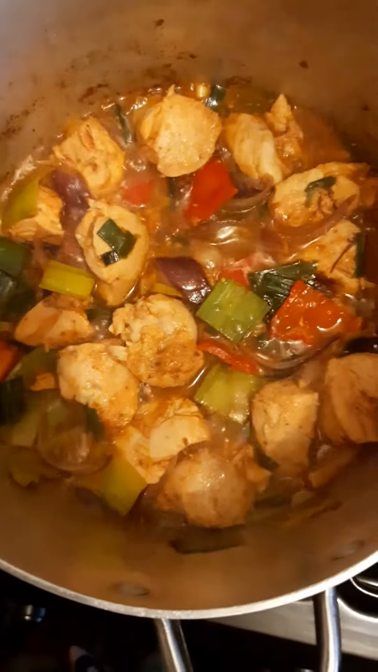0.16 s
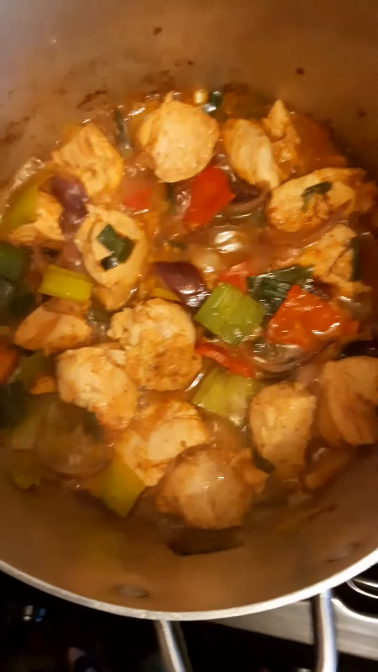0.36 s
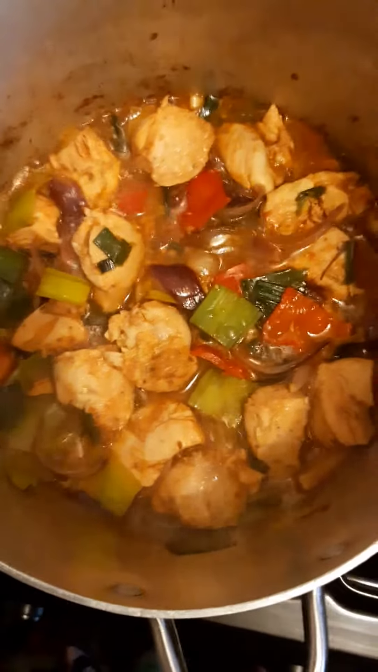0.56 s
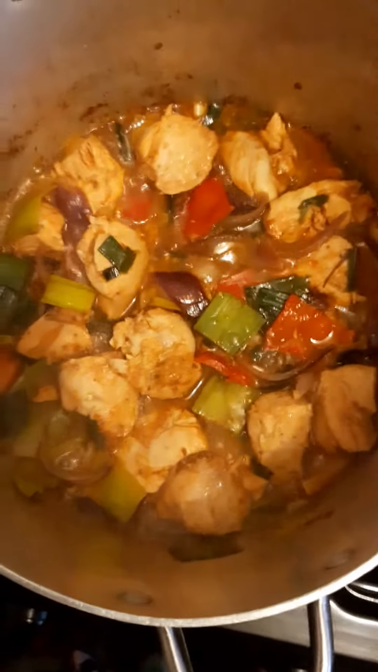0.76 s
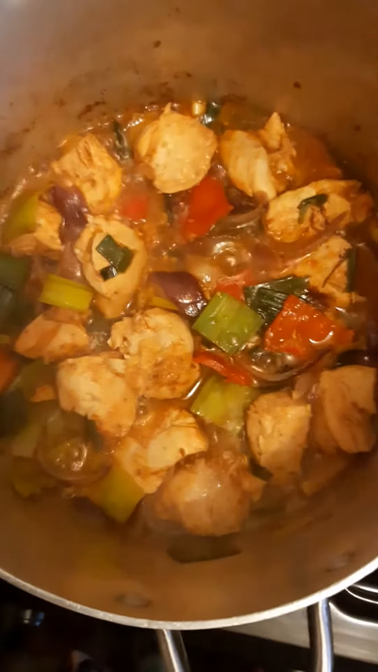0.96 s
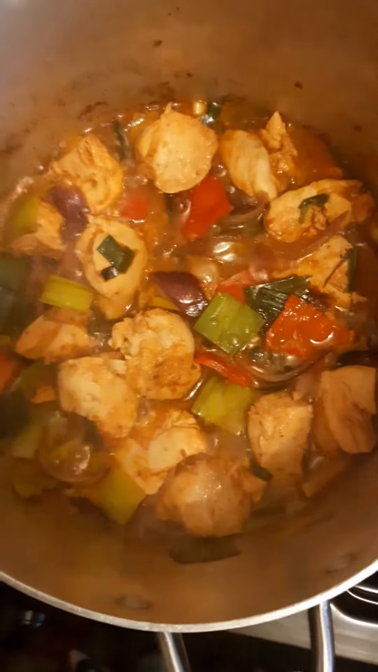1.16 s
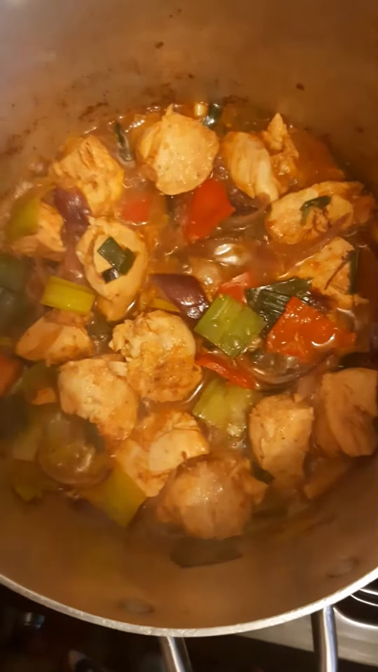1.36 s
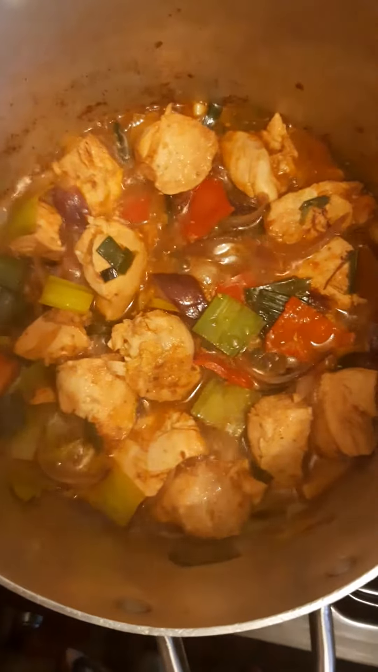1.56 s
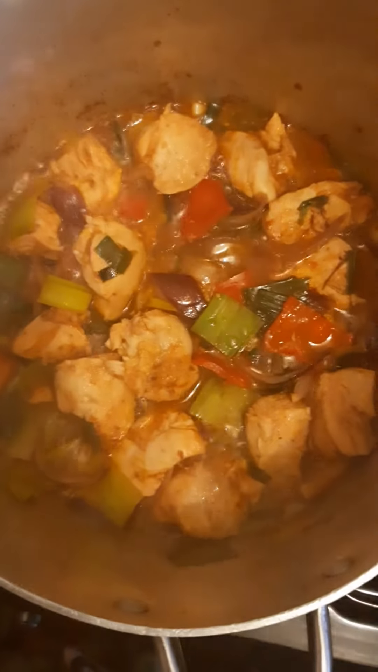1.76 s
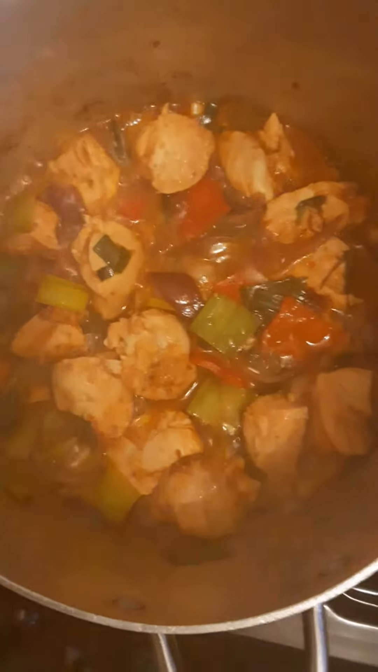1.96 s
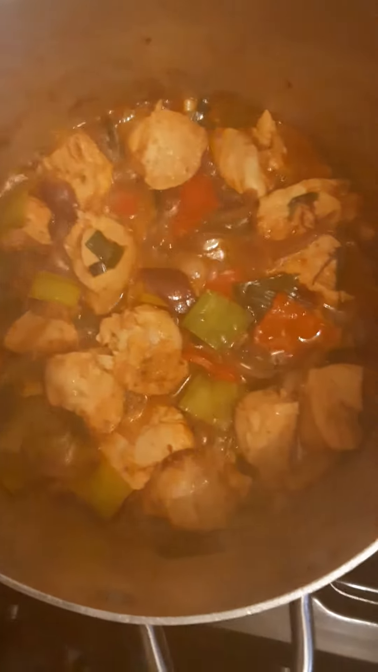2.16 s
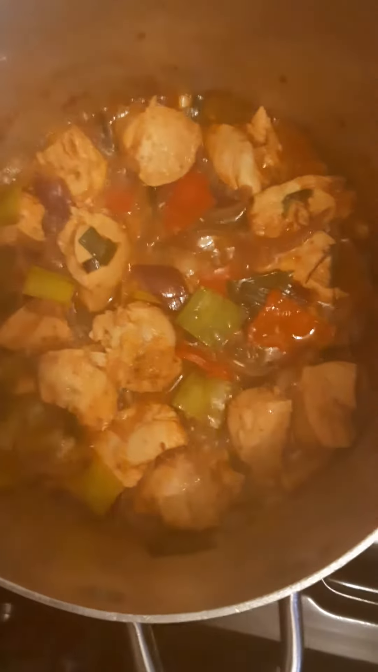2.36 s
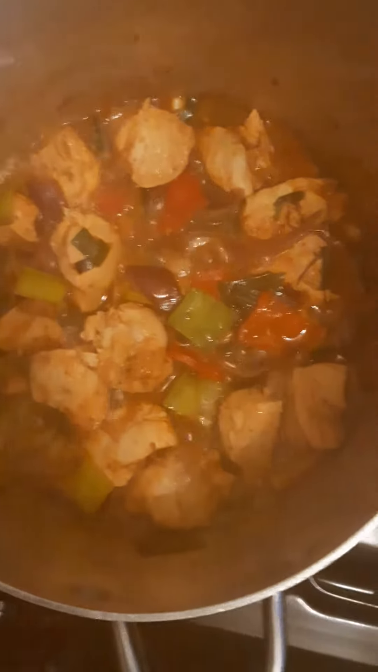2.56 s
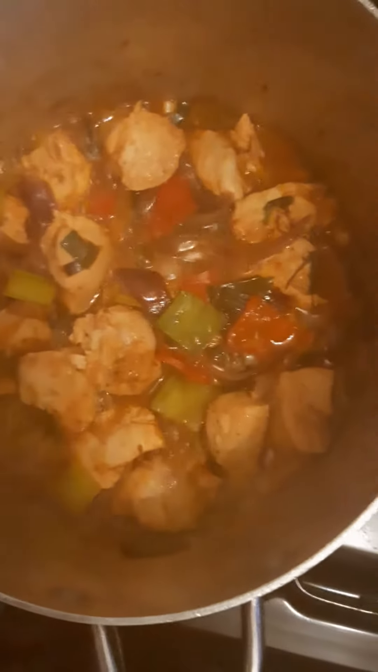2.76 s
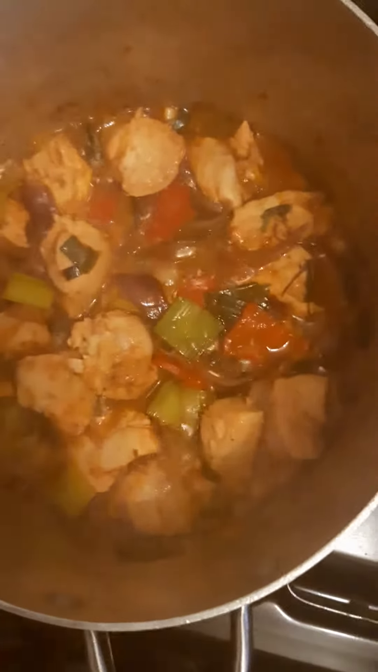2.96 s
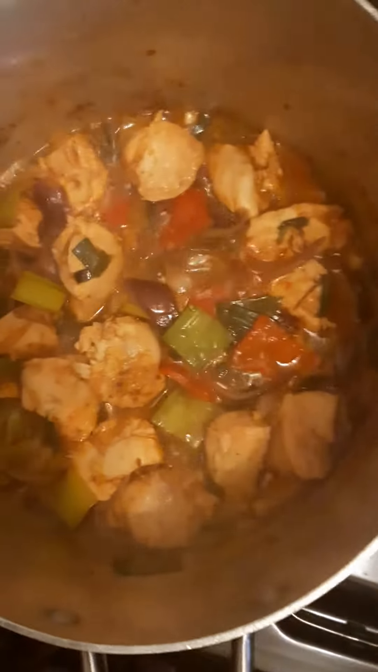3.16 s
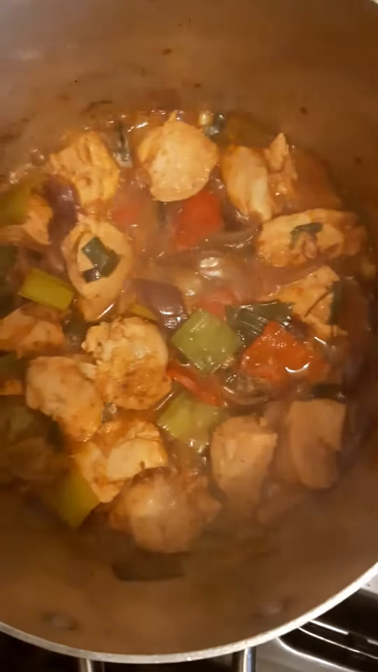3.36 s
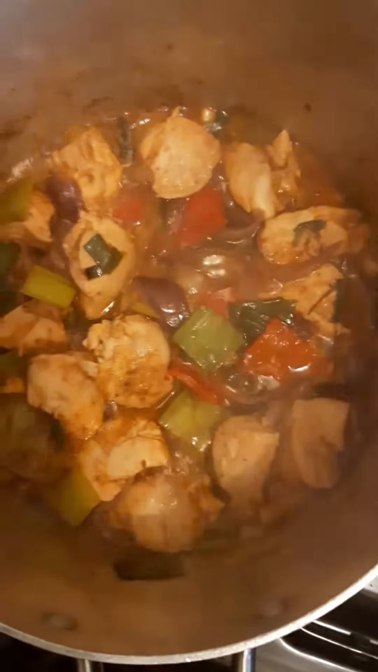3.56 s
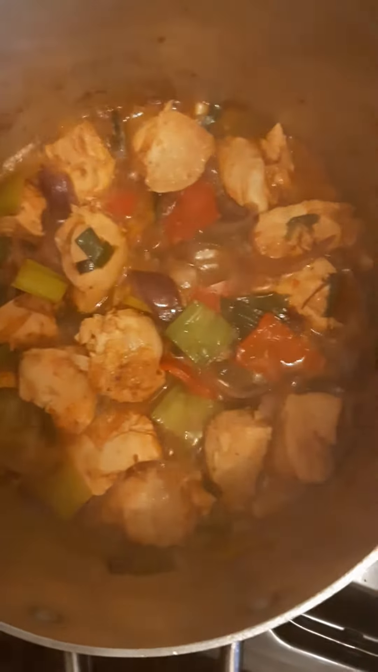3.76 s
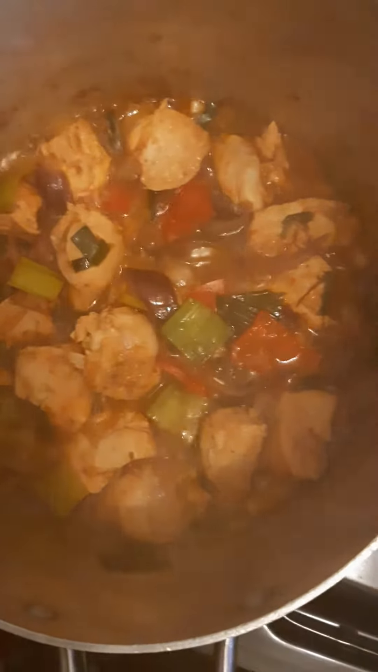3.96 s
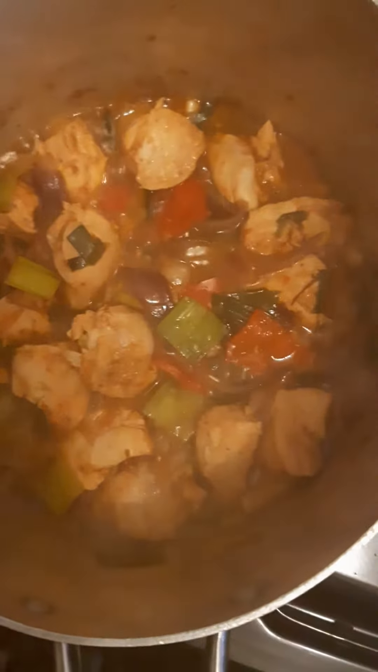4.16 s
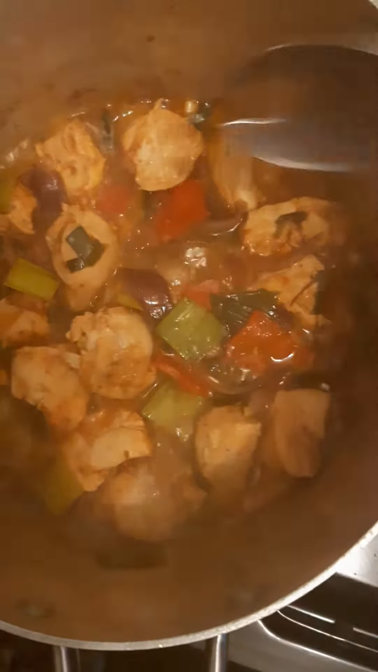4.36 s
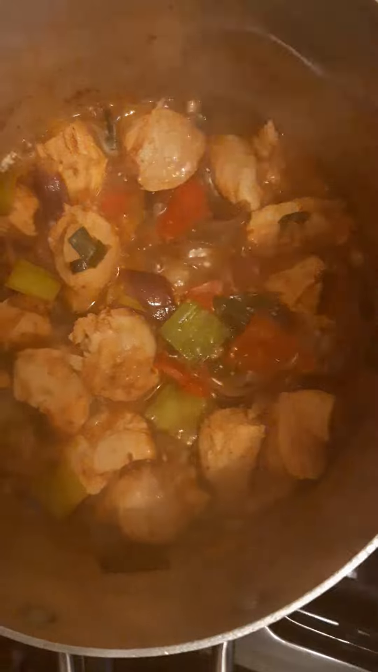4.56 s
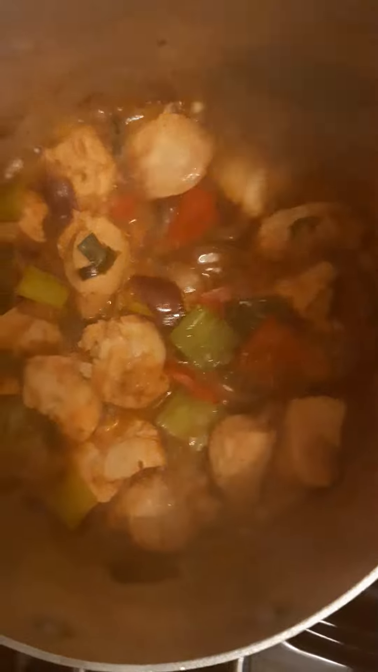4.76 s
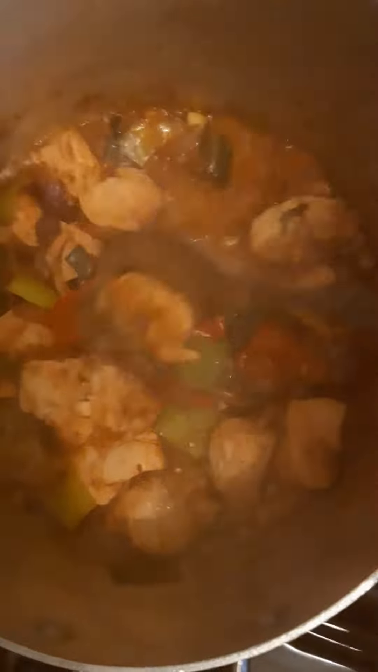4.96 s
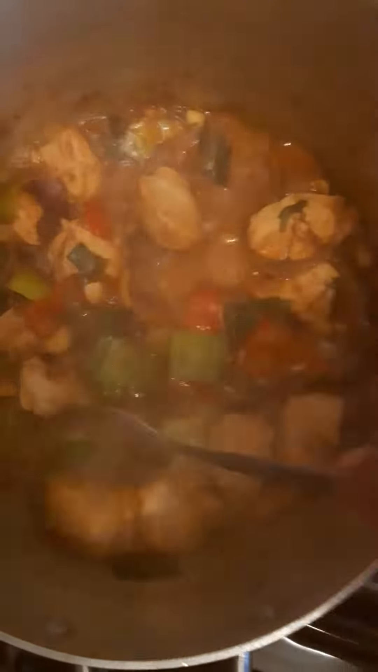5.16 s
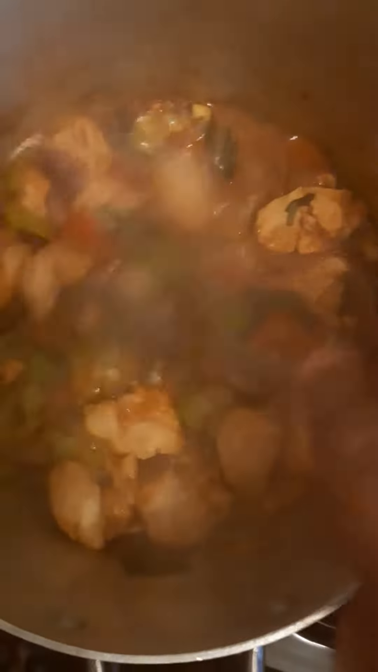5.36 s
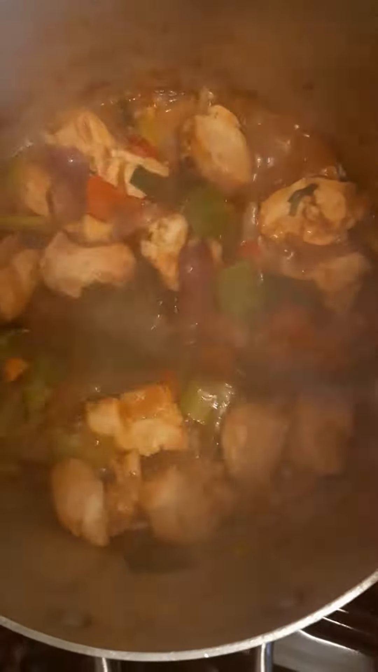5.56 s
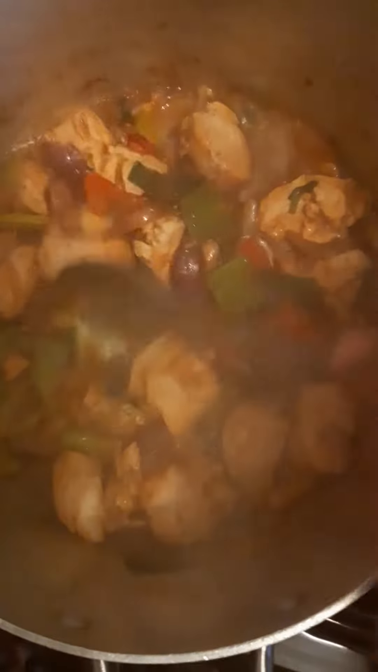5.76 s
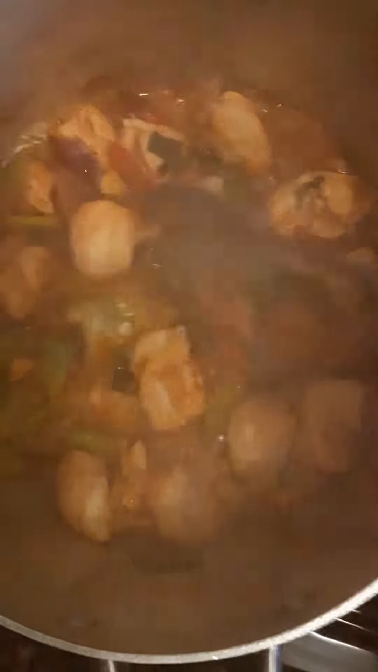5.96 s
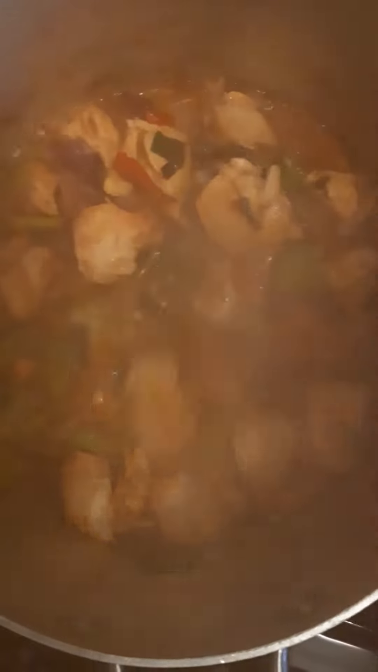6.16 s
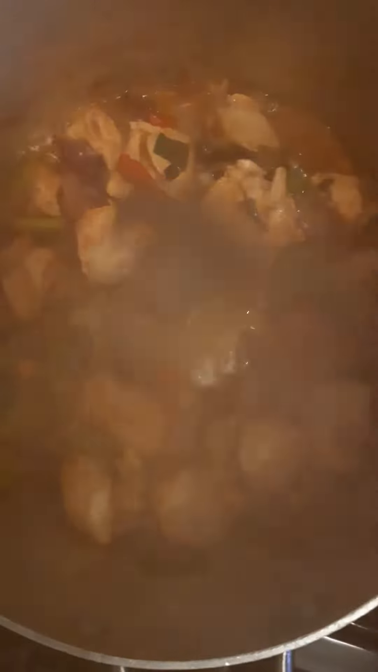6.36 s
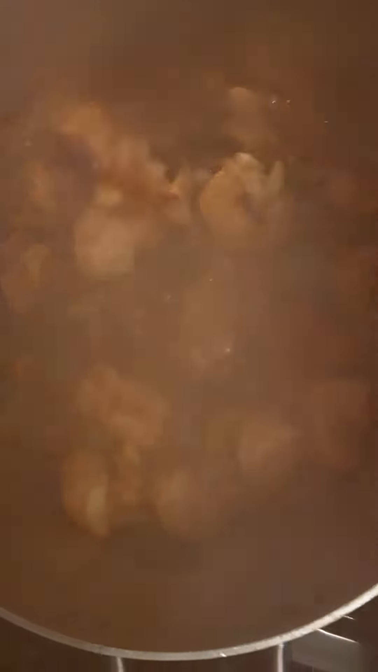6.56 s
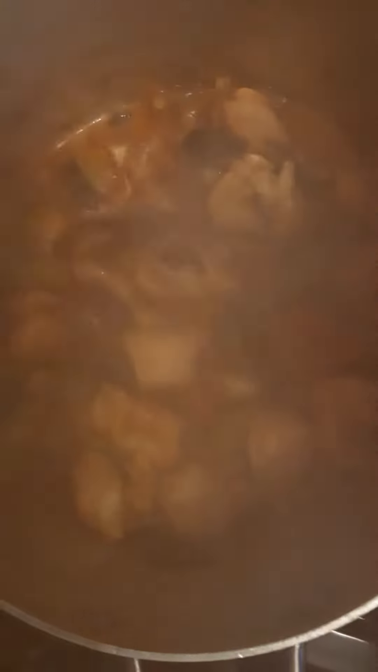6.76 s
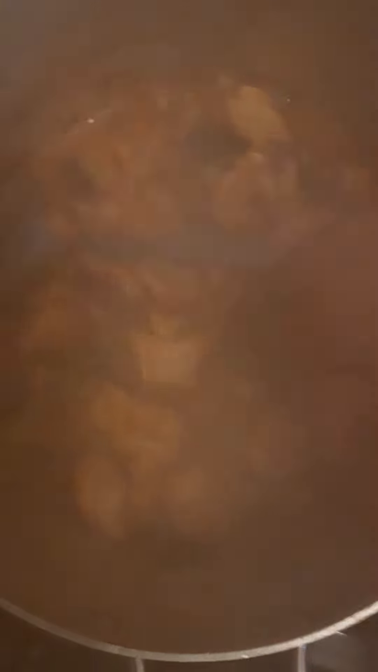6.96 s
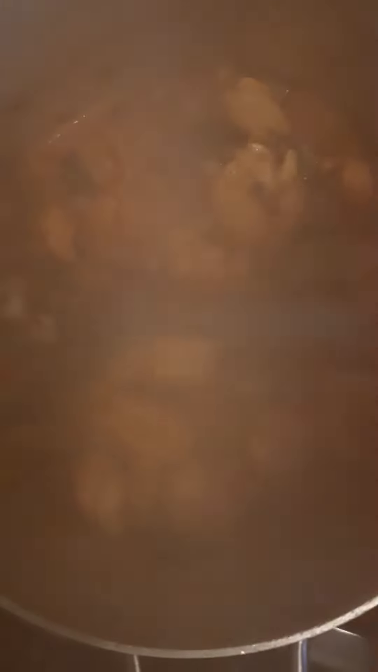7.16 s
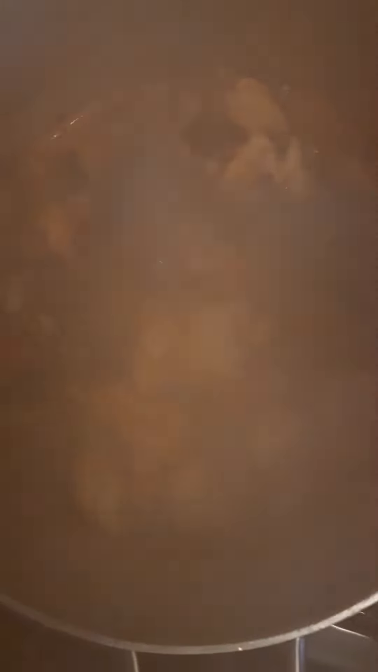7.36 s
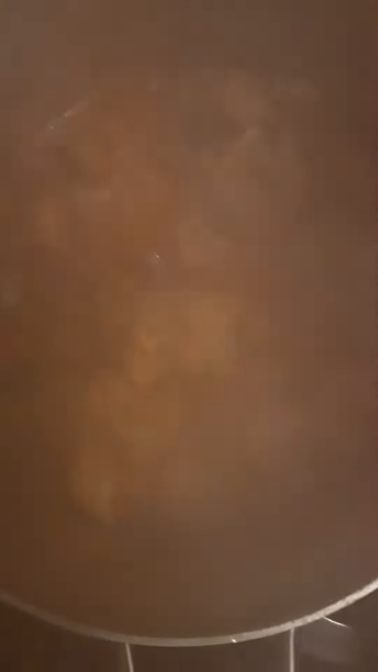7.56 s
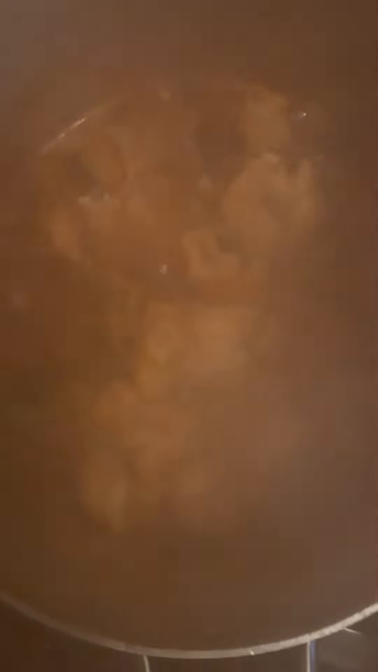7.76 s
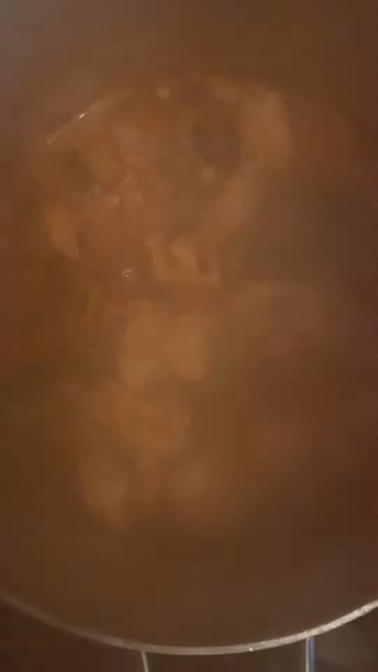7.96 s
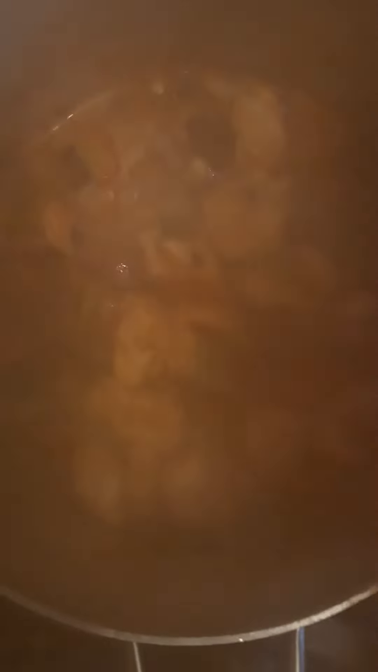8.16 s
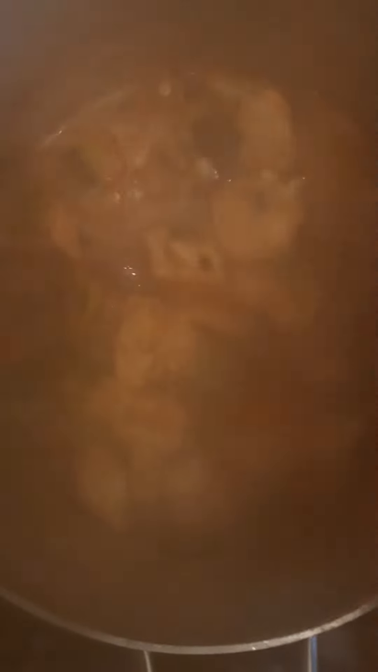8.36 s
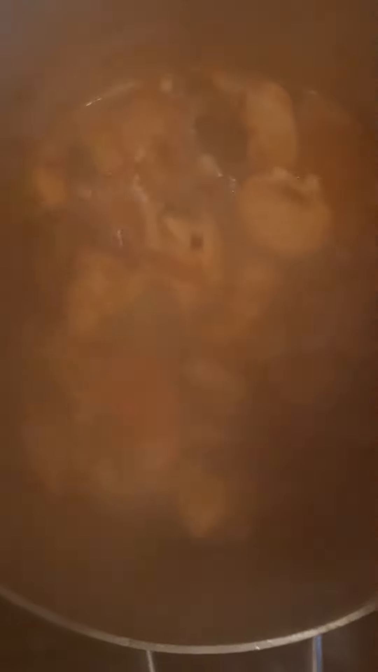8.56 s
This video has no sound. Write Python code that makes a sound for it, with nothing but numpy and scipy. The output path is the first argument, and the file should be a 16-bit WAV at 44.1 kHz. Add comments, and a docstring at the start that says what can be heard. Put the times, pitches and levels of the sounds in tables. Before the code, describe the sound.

Heard close above a pot in a kitchen, chicken and vegetables simmer with small plops and a fine, steady crackle while a gas burner rumbles faintly. A spoon clinks brightly against a ceramic dish, then starts knocking and scraping inside the steel pot. One loud knock with a dull thump stands out around six seconds. The knocks and scrapes come more often near the end, with wet gulps from the sauce.

```python
"""Chicken and vegetables simmer in a steel pot on a gas stove, heard from just above the rim.
Steam bubbles plop and ring the air in the pot; fat crackles on the hot metal. Under them the
flame rumbles and a narrow jet whistles on and off. A spoon clinks and slides on its ceramic
rest, then stirs: it knocks and scrapes the pot, jolts the load and makes the sauce gulp."""
import sys
import numpy as np
from scipy import signal
from scipy.fft import rfft, irfft, next_fast_len
from scipy.io import wavfile
from scipy.ndimage import uniform_filter1d

SR = 44100
rng = np.random.default_rng(int(sys.argv[2]) if len(sys.argv) > 2 else 0)


def digitize_waveform(pressure):
    """Quantize a signal to 16-bit integers and store it at the path in sys.argv[1].

    Rows of a 2-D input are taken as channels; values are limited to [-1, 1].
    """
    field = np.atleast_2d(pressure).T
    bounded = np.clip(field, -1, 1)
    quanta = np.round(bounded * 32767).astype(np.int16)
    wavfile.write(sys.argv[1], SR, quanta)


N = 379260
T = np.arange(N) / SR
RING_T = T[:int(.6 * SR)]


def undb(db):
    """Decibels to gain."""
    return 10 ** (np.asarray(db) / 20)


def unit(x):
    """Scale to rms 1."""
    return x / np.sqrt(np.mean(x ** 2) + 1e-20)


def fade(t, t60_s):
    """Exponential decay, 60 dB down at t60_s."""
    return np.exp(-np.log(1000) * t / t60_s)


def add(out, start_s, x):
    """Mix x into out from start_s on."""
    i = max(int(start_s * SR), 0)
    out[..., i:i + x.shape[-1]] += x[..., :max(N - i, 0)]


def band(x, lo_hz, hi_hz, order=3):
    """Causal band-pass."""
    sos = signal.butter(order, [lo_hz, min(hi_hz, .45 * SR)], "band", fs=SR, output="sos")
    return signal.sosfilt(sos, x + 1e-18)


def highpass(x, hz):
    """Second-order high-pass."""
    return signal.sosfilt(signal.butter(2, hz, "high", fs=SR, output="sos"), x)


def colour(x, points):
    """Equalise by (Hz, dB) points."""
    hz, db = np.transpose(points)
    n = x.shape[-1]
    size = next_fast_len(n + SR // 20)
    bin_hz = np.maximum(np.fft.rfftfreq(size, 1 / SR), 1)
    gain = undb(np.interp(np.log(bin_hz), np.log(hz), db))
    return irfft(rfft(x, size) * gain, size)[..., :n]


def resonate(x, peaks):
    """Sum of band-pass resonances."""
    return sum(undb(db) * signal.lfilter(*signal.iirpeak(hz, hz / width_hz, fs=SR), x)
               for hz, width_hz, db in peaks)


def ports(pair, apart_hz=750, bass_width=0.36):
    """Two unrelated signals to left and right: alike in the bass, unlike in the treble."""
    mid, side = pair
    side = bass_width * side + (1 - bass_width) * highpass(side, apart_hz)
    return np.array([mid + side, mid - side])


def plops(per_s, centre_hz, spread, cycles, size_db, glide=0.11):
    """Bubbles ring briefly and rise in pitch as they burst; few are large."""
    out = np.zeros((2, N))
    for when, size, a, b, angle in rng.random((int(per_s * N / SR), 5)):
        hz = centre_hz * np.exp(spread * (a + b - 1))
        t = T[:int(cycles / hz * SR)]
        plop = np.sin(2 * np.pi * hz * t * (1 + glide * t / t[-1])) * fade(t, t[-1])
        place = np.array([[np.cos(2 * np.pi * angle)], [np.sin(2 * np.pi * angle)]])
        add(out, when * N / SR, place * plop * undb(-size_db * np.log(size + 0.0019)))
    return unit(out)


def flame():
    """The gas flame: steady low noise."""
    # Each row: frequency in Hz, gain in dB.
    spectrum = [(25, -16), (60, -22), (95, 9.5), (140, -4.5), (185, 4), (260, -20), (500, 12.5),
                (1000, -18.5)]
    noise = ports(rng.standard_normal((2, N)), apart_hz=596, bass_width=0.16)
    return unit(colour(noise, spectrum))


def whistle(pitch_hz=7838, waver_hz=7, fade_db_per_s=25, idle_db=-75):
    """A narrow jet sings one unsteady note; each spell swells, holds and dies to a trace."""
    # Each row: start in seconds, hold in seconds, level in dB.
    spells = [(0, 2.2, -58), (4.55, 0.76, -59), (7.05, 0.4, -70)]
    hz = pitch_hz + waver_hz * unit(uniform_filter1d(rng.standard_normal(N), size=600))
    phase = 2 * np.pi * np.cumsum(hz) / SR
    envelope = sum(undb(db - fade_db_per_s * np.abs(T - np.clip(T, start_s, start_s + hold_s)))
                   for start_s, hold_s, db in spells)
    return np.sqrt(2) * np.sin([phase, phase + 1.4]) * np.maximum(envelope, undb(idle_db))


def response(modes, wash_db, low_t60_s, high_t60_s, note_hz, note_db, uneven_db=1.5, echo_db=-1):
    """One touch rings modes weighted by the spot hit, their kitchen echo and a wash of finer modes."""
    t = RING_T
    hz, db, t60_s = np.transpose(modes)[:, :, None]
    db = db + note_db * np.exp(-((hz - note_hz) / (0.11 * hz)) ** 2)
    db += uneven_db * rng.standard_normal(hz.shape)
    # A shifting load detunes the low modes.
    hz = hz * (1 + 0.012 * rng.standard_normal(hz.shape) / (1 + (hz / 480) ** 4))
    phase = rng.uniform(0, 2 * np.pi, (2, len(modes)))
    waves = undb(db) * fade(t, t60_s) * np.exp(2j * np.pi * hz * t)
    tones = unit((np.exp(1j * phase) @ waves).imag)
    noise, walls = rng.standard_normal((2, 2, len(t)))
    echo = signal.fftconvolve(tones, walls * fade(t, t60_s=0.23), axes=1)[:, :len(t)]
    wash = band(noise, 53, 1630, order=1) * fade(t, low_t60_s)
    wash += band(noise, 1260, 10000, order=1) * fade(t, high_t60_s)
    return unit(tones + undb(echo_db) * unit(echo) + undb(wash_db) * unit(wash))


def register_levels(voice_db, level_db, hardness_db, wall_db=0):
    """Register dB: a harder contact trades bass for treble, the bare wall lifts the middle."""
    # dB per dB of hardness and of wall ring, for thud, body, ring, tick, fizz.
    hard_share = [-1.13, -1.23, -0.077, 0.62, 1]
    wall_share = [0.021, 0.3, 0.95, 0.88, 0]
    tilt_db = hardness_db * np.array(hard_share) + wall_db * np.array(wall_share)
    return np.array(voice_db) + level_db + tilt_db


def voiced(x, register_db, length_s, shake_db=-17):
    """Set each register's rms over the first length_s; the stove shakes with the thud and ring."""
    # Band edges in Hz of the five registers: thud, body, ring, tick, fizz.
    edges_hz = [200, 440, 1400, 4000, 9000, 16000]
    # Each row: frequency in Hz, width in Hz, gain in dB.
    stove_modes = [(95, 10.6, 4.5), (129.4, 8.7, 3), (173, 16, -0.5)]
    parts = [band(x, lo, hi) for lo, hi in zip(edges_hz, edges_hz[1:])]
    touch = sum(undb(db) * part / np.sqrt(np.mean(part[:, :int(length_s * SR)] ** 2))
                for part, db in zip(parts, register_db))
    t = T[:x.shape[1]]
    rumble = band(ports(rng.standard_normal((2, SR)), bass_width=0.17), 34, 430)
    shake = unit(resonate(rumble, stove_modes))[:, :len(t)] * (fade(t, 0.77) - fade(t, 0.078))
    return touch + undb((register_db[0] + register_db[2]) / 2 + shake_db) * shake


def singing(hz, db, t60_s, spread=0.0253, twins_db=-13, damped_above_hz=1800, count=4):
    """One mode rings on, beating against weaker neighbours; high notes die sooner."""
    t = RING_T
    t60_s = t60_s * min(damped_above_hz / hz, 1) ** 0.3
    near_hz = hz * (1 + spread * rng.standard_normal((count, 1)))
    twins = np.exp(2j * np.pi * rng.random((2, count))) @ np.exp(2j * np.pi * near_hz * t)
    clear = np.sin(2 * np.pi * hz * t - np.array([[0], [1.37]]))
    return undb(db) * (clear + undb(twins_db) * twins.imag) * (fade(t, t60_s) - fade(t, 0.0075))


def strikes(rows, modes, voice_db, wash_db, low_t60_s, high_t60_s, crack_db, crack_t60_s, sing_t60_s):
    """Each blow is a snap, a short crack and the object's ring; two notes sing on."""
    # The spoon's own colour. Each row: frequency in Hz, gain in dB.
    spoon_eq = [(1500, 0), (2450, -10.5), (3700, 5), (5300, -11.5), (6600, 9.5), (8400, -1), (9500, 1.5),
                (11200, -10), (12300, -2), (14500, -7)]
    firm_db, snap_db = -28, 2

    def blow(note_hz, note_db, second_hz, second_db, level_db, hardness_db, wall_db=0, hollow=0):
        ring = response(modes, wash_db, low_t60_s, high_t60_s, note_hz,
                        note_db=2, uneven_db=2.5, echo_db=3.5)
        ring /= np.std(ring[:, :1000])
        light_db = 0.26 * (firm_db - level_db)  # lighter touch: more crack, less ring
        crack = undb(crack_db + light_db) * rng.standard_normal(ring.shape)
        crack *= fade(RING_T, crack_t60_s) + undb(snap_db) * fade(RING_T, 0.004)
        register_db = register_levels(voice_db, level_db, hardness_db, wall_db)
        body = voiced(ports(crack + ring), register_db, length_s=0.011)
        body = colour(body, [(hz, hollow * db) for hz, db in spoon_eq])
        return body + singing(note_hz, note_db, sing_t60_s) + singing(second_hz, second_db, sing_t60_s)

    out = np.zeros((2, N))
    for start_s, *contact in rows:
        add(out, start_s, blow(*contact))
    return out


def scrapes(rows, modes, voice_db, wash_db, direct_db, note_db, slips_per_s=1300, uneven_db=3.5):
    """The spoon sticks and slips, pressed hardest in mid-stroke; each slip rings the object."""
    out = np.zeros((2, N))
    for start_s, length_s, note_hz, *contact in rows:
        ring = response(modes, wash_db, 0.65, 0.23, note_hz, note_db)
        ring += undb(direct_db) * rng.standard_normal(ring.shape) * fade(RING_T, 0.006)
        n = int(length_s * SR)
        direction, size = rng.standard_normal((2, len(RING_T)))[:, :n]
        slipping = rng.random(len(RING_T))[:n] < slips_per_s / SR
        slips = slipping * np.sign(direction) * undb(uneven_db * size)
        pressure = np.sqrt(np.sin(np.pi * np.arange(n) / n))
        rub = signal.fftconvolve(ring, (slips * pressure)[None], axes=1)
        add(out, start_s, voiced(ports(rub), register_levels(voice_db, *contact), length_s + 0.019))
    return out


def damped_notes(rows, lag_s=0.0004):
    """One damped sine a row, reaching the right port lag_s later."""
    out = np.zeros((2, N))
    t = np.maximum(RING_T - np.array([[0], [lag_s]]), 0)
    for start_s, hz, db, t60_s in rows:
        add(out, start_s, undb(db) * np.sin(2 * np.pi * hz * t) * (fade(t, t60_s) - fade(t, 0.0088)))
    return out


def spoon_on_rest():
    """The spoon clinks and slides on a ceramic dish too small to radiate bass."""
    # Each row: frequency in Hz, level in dB, t60 in seconds.
    modes = [(772, 8.5, 0.2), (1027, 7.5, 0.077), (1106, 3, 0.058), (1222, 5, 0.13), (1800, -3.5, 0.18),
             (1985, -1, 0.27), (2570, -5, 0.19), (2920, -2.5, 0.12), (3410, -2, 0.067), (3591, 7.5, 0.037),
             (4120, -8, 0.07), (4339, 6, 0.04), (4820, 5.5, 0.073), (5160, -2, 0.058), (6100, 1, 0.047),
             (6190, 5, 0.056), (8629, -15, 0.12), (10300, -15, 0.11), (12000, -2, .09), (14400, -10, .07)]
    # Each row: start in seconds, note in Hz, its dB, second note in Hz, its dB, level in dB,
    # hardness in dB.
    clinks = [(3.177, 1800, -38, 2430, -45, -63, 3), (3.549, 774, -32, 1230, -35, -41.5, -5),
              (3.616, 777, -18, 1224, -21, -25, 0.5), (3.623, 1045, -25, 3490, -32, -37, 5),
              (3.699, 3591, -50, 4340, -55, -51, 1)]
    # Each row: start in seconds, length in seconds, boosted note in Hz, level in dB, hardness in dB.
    slides = [(3.155, 0.038, 1800, -47, 8.5), (3.305, 0.037, 2620, -49, 3), (3.335, 0.053, 760, -53, -4.5),
              (3.545, 0.082, 1070, -49.5, -5)]
    # Offsets for thud, body, ring, tick, fizz.
    clink_voice_db = [-34, 4, 1.5, 0.5, -9]
    slide_voice_db = [-12.5, 9, 3, -15, -27]
    out = strikes(clinks, modes, clink_voice_db, wash_db=-11.5, low_t60_s=0.6, high_t60_s=0.44,
                  crack_db=-2, crack_t60_s=0.014, sing_t60_s=0.23)
    out += scrapes(slides, modes, slide_voice_db, wash_db=0, direct_db=25, note_db=12)
    return band(out, 690, 16000)


def spoon_on_pot():
    """The spoon knocks and scrapes the steel pot and jolts the load, which damps the low modes."""
    # Each row: frequency in Hz, level in dB, t60 in seconds.
    modes = [(252.4, -1.5, 0.35), (337.4, -2, 0.36), (417.2, 1, 0.22), (514, -1.5, 0.22), (673.5, 2, 0.18),
             (737, 0.5, 0.15), (789, 2.5, 0.1), (838, 3, 0.095), (1062, 2.5, 0.095), (1670, 0.5, 0.18),
             (2036, 1, 0.07), (2180, 7, 0.075), (2420, 6.5, 0.045), (2676, 11.5, 0.041), (2890, 7, 0.048),
             (3390, 3.5, 0.075), (3520, 2, 0.07), (3850, 1, 0.076), (4220, -1, 0.063), (5240, 0, 0.06),
             (5480, 6.5, 0.06), (5986, 2, 0.06), (6140, 10.5, 0.035), (6580, 4, 0.028), (6850, 3, 0.039),
             (7300, 0, 0.047), (8400, -8, 0.055), (8640, -3, 0.06), (9400, -5, 0.06), (10340, -2, 0.055),
             (11500, 7, 0.055), (11940, 3, 0.055), (12764, 1, 0.06)]
    # Each row: start in seconds, note in Hz, its dB, second note in Hz, its dB, level in dB, hardness
    # in dB, wall ring in dB (high on bare wall, low in the stew), share of the spoon's colour.
    knocks = [(4.602, 253, -32, 1675, -35, -38, -3, 9.5, 0),
              (4.703, 254.6, -32, 6540, -45, -41.5, -2, -10, 0.6),
              (4.759, 2654, -30, 784, -30.5, -38, 13, -5, 0.48),
              (4.772, 2740, -35, 254.6, -33, -35, 10, -1, 0.65),
              (5.400, 1060, -48, 1663, -47, -55.5, -9, 12, 0),
              (6.066, 337, -29, 6470, -31, -21.5, 2, -7.5, 1),
              (6.111, 3510, -34.5, 6160, -31, -31, 8, -2, 0.86),
              (6.187, 1910, -50, 2830, -54, -47, 1, 0, 0),
              (6.511, 1667, -22, 2890, -22.5, -24, 10, -1, 0.16),
              (6.824, 505, -50, 1670, -56, -55.5, -7, 2, 0),
              (7.482, 3790, -32, 2825, -31, -28.5, 5.5, 6, 0.4),
              (7.553, 190, -35, 10600, -33, -23.5, 4.5, -9.5, 1),
              (7.708, 677, -30.5, 2220, -31, -38, -3.5, 6.5, 0),
              (7.755, 790, -27, 2692, -40, -35, 3, 3.5, 0), (8.077, 2900, -30, 1990, -31, -28, 5.5, 3.5, 0),
              (8.129, 841, -36, 2140, -33, -30, -7.5, 4, 0),
              (8.337, 337.3, -22.5, 5220, -26.5, -33.5, 1, 6.5, 0),
              (8.363, 1075, -31, 5200, -32, -40, -3, 6.5, 0)]
    # Each row: start in seconds, length in seconds, boosted note in Hz, level in dB, hardness in dB.
    drags = [(4.744, 0.036, 2650, -33, 2), (5.14, 0.035, 2185, -53, 1), (5.388, 0.034, 510, -50, 6.5),
             (5.715, 0.053, 258, -56.5, -3), (6.96, 0.04, 516, -57, 0.5), (7.642, 0.023, 2500, -45, 0.5),
             (7.698, 0.037, 676, -38, 0.5), (7.72, 0.049, 2240, -34, -1), (7.765, 0.016, 5170, -48, 5),
             (8.192, 0.045, 940, -41.5, -4.5), (8.212, 0.041, 2700, -42, 5), (8.355, 0.05, 2180, -38, -1.5)]
    # Each row: start in seconds, pitch in Hz, level in dB, t60 in seconds.
    jolts = [(4.704, 330, -26, 0.031), (4.757, 413, -18, 0.06), (6.067, 533, -0.5, 0.027),
             (6.513, 507, -26.5, 0.13), (6.52, 256.5, -34, 0.49), (6.825, 483, -20.5, 0.015),
             (8.129, 264, -8, 0.07)]
    # Offsets for thud, body, ring, tick, fizz.
    knock_voice_db = [-1.3, -1.3, 1, -0.69, -1.3]
    drag_voice_db = [-1, .5, 3, 0.9, -3]
    out = strikes(knocks, modes, knock_voice_db, wash_db=2, low_t60_s=0.51, high_t60_s=0.13,
                  crack_db=8.5, crack_t60_s=0.037, sing_t60_s=0.24)
    out += scrapes(drags, modes, drag_voice_db, wash_db=-3.5, direct_db=29.5, note_db=13.5)
    return out + damped_notes(jolts)


def sloshing():
    """Steam pockets gulp out of the thick sauce as the spoon shoves it."""
    # Each row: start in seconds, length in seconds, level in dB.
    shoves = [(4.78, 0.11, -52), (7.56, 0.157, -39), (8.179, 0.093, -33.5), (8.365, 0.11, -40.5)]
    gulps = plops(per_s=260, centre_hz=322, spread=0.6, cycles=17, size_db=1.5)
    envelope = sum(undb(db) * np.sin(np.pi * np.clip((T - start_s) / length_s, 0, 1))
                   for start_s, length_s, db in shoves)
    return envelope * unit(ports(gulps))


def fat_spit():
    """A drop of fat spits once."""
    # Each row: start in seconds, pitch in Hz, level in dB, t60 in seconds.
    spits = [(5.332, 4120, -20, 0.016)]
    return damped_notes(spits)


def pops(per_s, spread_db):
    """Tiny bursts all over the pot, mostly weak, each with its own left-right lag."""
    when, strength, polarity, side = rng.random((int(per_s * N / SR), 4)).T
    size = undb(-spread_db * np.log(strength + 0.0038)) * np.sign(polarity - .5)
    at = (when * N).astype(int)
    lag = ((side - .5) * .0008 * SR).astype(int)
    return np.array([np.bincount((at + k * lag) % N, size, N) for k in (0, 1)])


def sizzle(hiss_db=-3, splash_t60_s=0.021, splash_db=-19, fine_db=-1.5, tick_ratio=1.36, spots=10):
    """Fat droplets crackle on hot metal, smeared by the wall; the smallest tick at each spot's pitch."""
    # Each row: frequency in Hz, gain in dB.
    spectrum = [(400, -26), (720, -4.5), (1100, -5.5), (1500, -10), (1750, -3.5), (2350, -6), (3150, -11.5),
                (4600, -9), (6500, -12), (9800, -13), (12300, -11), (16000, -14.5)]
    t = T[:2000]
    coarse, fine = np.zeros((2, 2, N))
    for hz in np.geomspace(4800, 14500, spots):
        wall = undb(splash_db) * rng.standard_normal((2, len(t))) * fade(t, splash_t60_s)
        wall[:, 0] = 1  # direct sound
        tick = band(wall, hz / tick_ratio, hz * tick_ratio, order=2)
        coarse += signal.oaconvolve(pops(per_s=2000 / spots, spread_db=2.5), wall, axes=1)[:, :N]
        fine += signal.oaconvolve(pops(per_s=1800 / spots, spread_db=5), tick, axes=1)[:, :N]
    crackle = band(unit(coarse), 340, 7000, order=1) + undb(fine_db) * unit(fine)
    hiss = undb(hiss_db) * rng.standard_normal((2, N))
    return unit(colour(unit(crackle) + hiss, spectrum))


def bubbling(direct_db=-12, beads_db=-15):
    """Large steam bubbles ring the air in the pot; small beads burst brightly on the surface."""
    # Each row: frequency in Hz, width in Hz, gain in dB.
    air_modes = [(350, 17.5, 5), (409.5, 41, 3), (470, 40, -1), (523.8, 14.8, 9.5), (605, 30, 6),
                 (1123.5, 21, 14)]
    large = plops(per_s=520, centre_hz=444, spread=0.7, cycles=5.86, size_db=2.5)
    beads = plops(per_s=350, centre_hz=5440, spread=0.87, cycles=32, size_db=4.5)
    air = ports(resonate(large, air_modes) + undb(direct_db) * large, apart_hz=1040, bass_width=0.46)
    return unit(air) + undb(beads_db) * beads


def boil_levels(surge_per_s=7, surge_db=0.5):
    """The boil holds, sinks as the stew is turned, then wells up; small random surges ride on it."""
    # Each row: time in seconds, bubbling in dB, sizzle in dB.
    boil = [(0, -49, -48.5), (5.5, -48, -48), (7.3, -53.5, -51), (8.6, -45, -50)]
    time_s, bubble_db, sizzle_db = np.transpose(boil)
    knots_s = np.arange(0, N / SR + 1, 1 / surge_per_s)
    swell_db = surge_db * np.interp(T, knots_s, rng.standard_normal(N)[:len(knots_s)])
    return np.interp(T, time_s, bubble_db) + swell_db, np.interp(T, time_s, sizzle_db) + swell_db / 2


def scene():
    """The simmering pot, the flame beneath it and the spoon."""
    bubble_db, sizzle_db = boil_levels()
    burner = undb(-57) * flame()
    stew = undb(bubble_db) * bubbling() + undb(sizzle_db) * sizzle() + fat_spit() + whistle()
    spoon = spoon_on_rest() + spoon_on_pot() + sloshing()
    return burner + stew + spoon


def record(dry, bottom_hz=75, top_hz=15750):
    """The phone colours each microphone port, drops deep bass, rounds peaks and cuts the top."""
    # Each row: frequency in Hz, left minus right in dB.
    balance = [(100, 2), (280, -2.5), (560, 3.5), (1100, 2.5), (2200, 0.5), (4400, 0.5), (8500, 1),
               (15000, 4)]
    left = colour(dry[0], [(hz, db / 2) for hz, db in balance])
    right = colour(dry[1], [(hz, -db / 2) for hz, db in balance])
    rounded = np.tanh(highpass([left, right], bottom_hz))
    return signal.sosfilt(signal.ellip(10, .2, 80, top_hz, fs=SR, output="sos"), rounded)


dry = scene()
out = record(dry)
digitize_waveform(out)
```